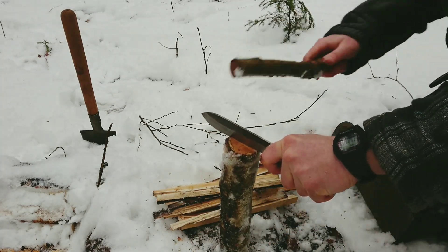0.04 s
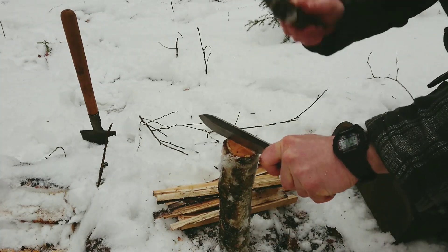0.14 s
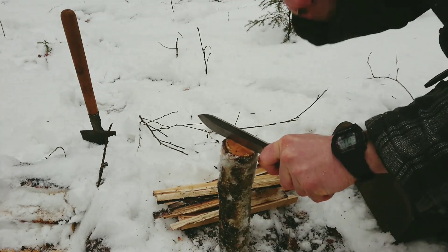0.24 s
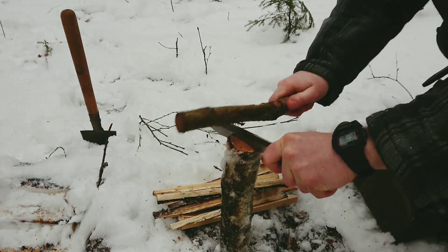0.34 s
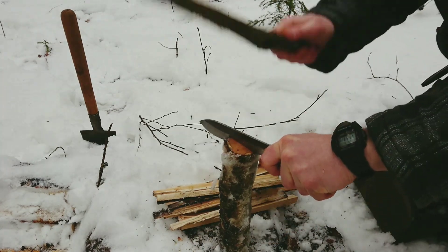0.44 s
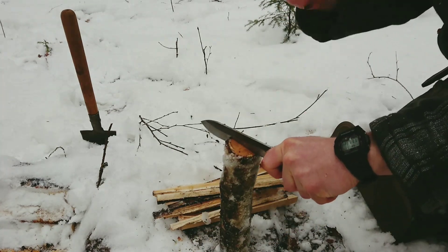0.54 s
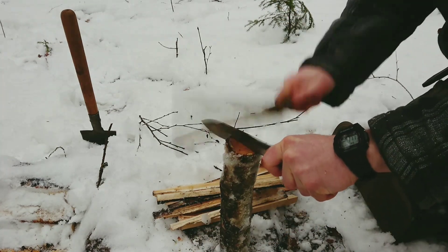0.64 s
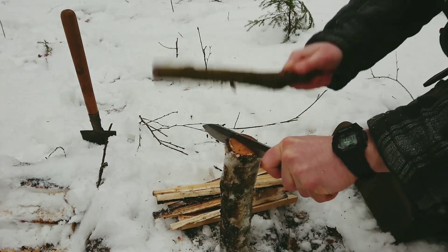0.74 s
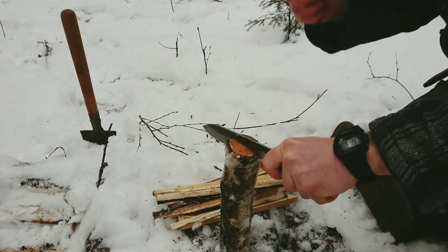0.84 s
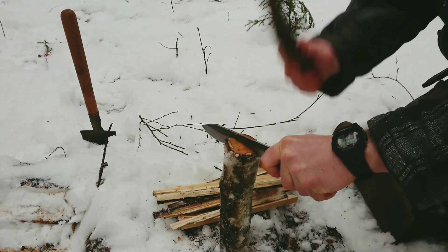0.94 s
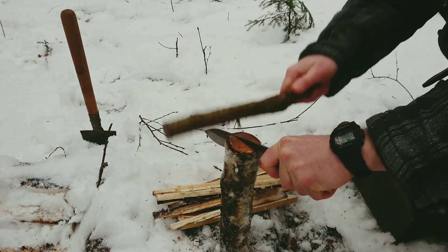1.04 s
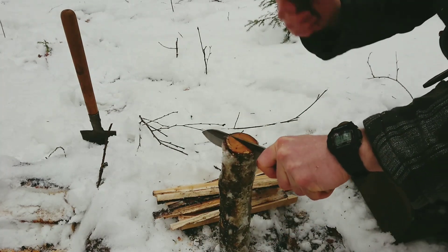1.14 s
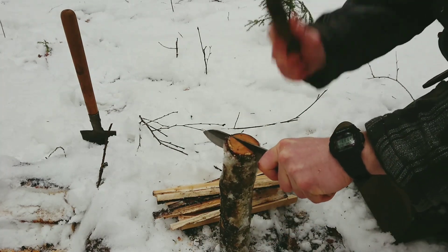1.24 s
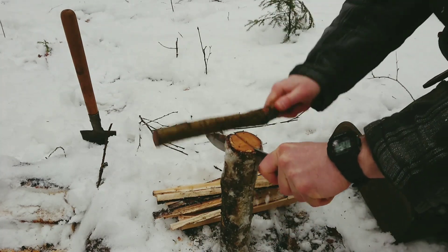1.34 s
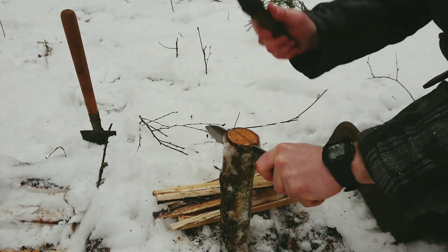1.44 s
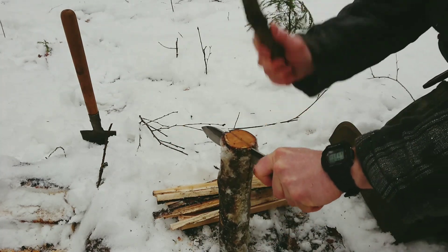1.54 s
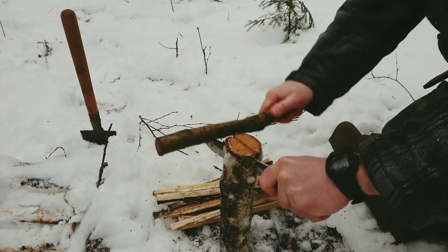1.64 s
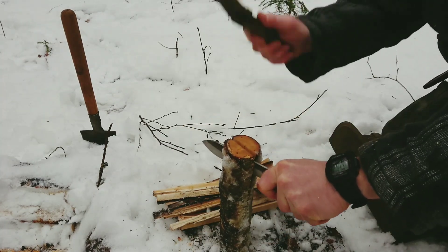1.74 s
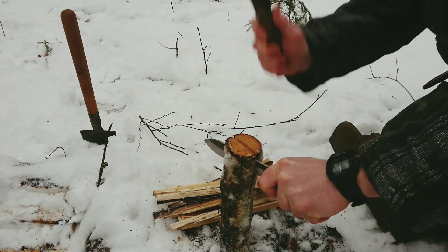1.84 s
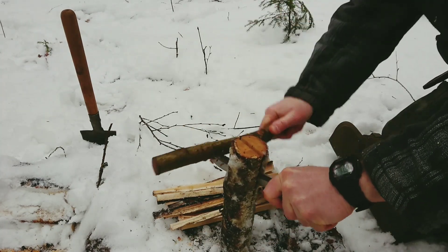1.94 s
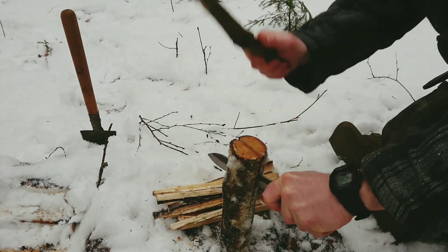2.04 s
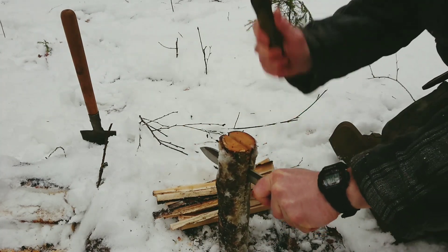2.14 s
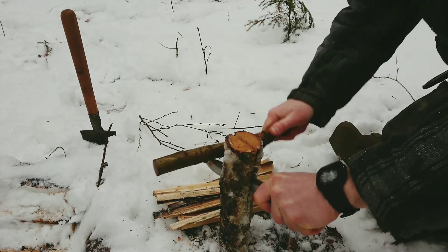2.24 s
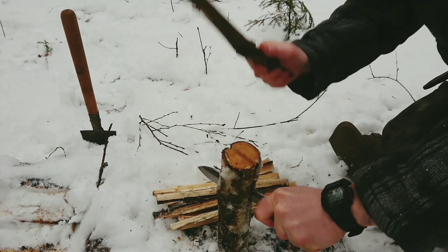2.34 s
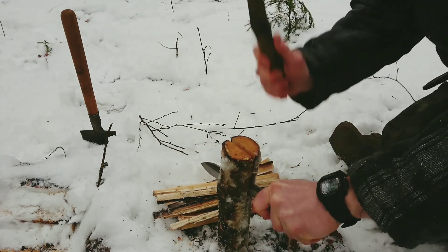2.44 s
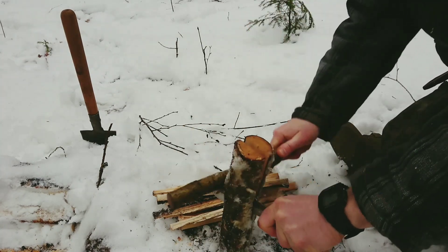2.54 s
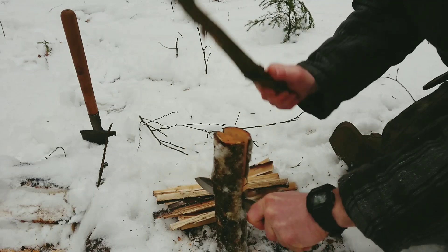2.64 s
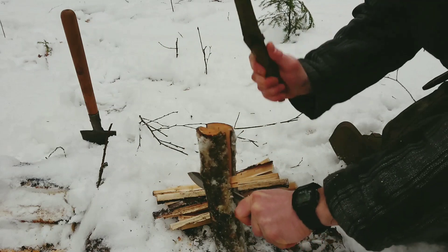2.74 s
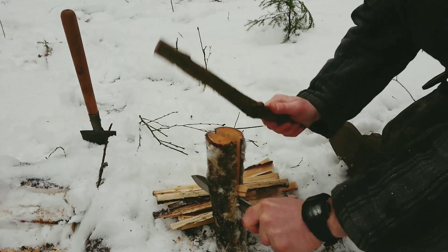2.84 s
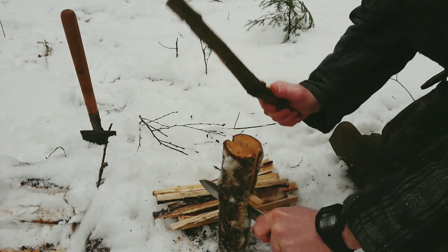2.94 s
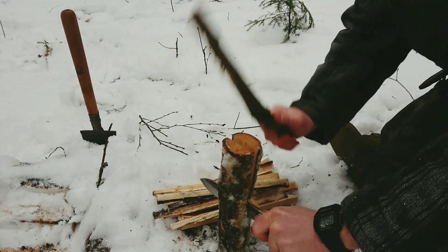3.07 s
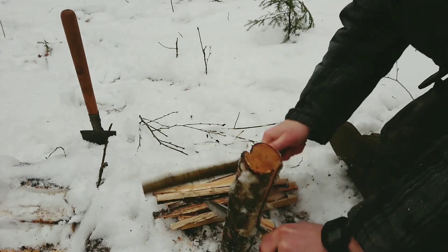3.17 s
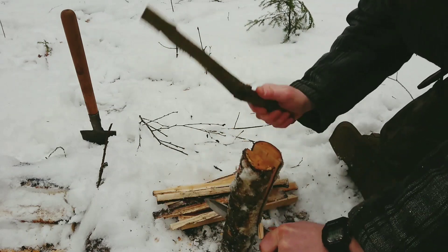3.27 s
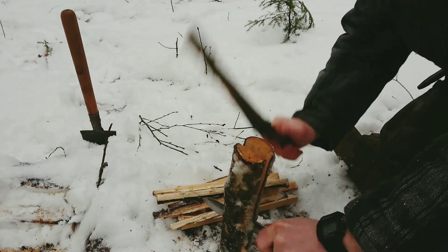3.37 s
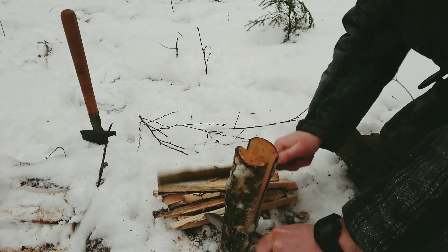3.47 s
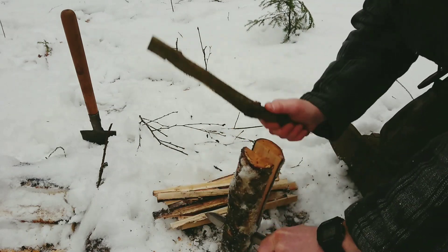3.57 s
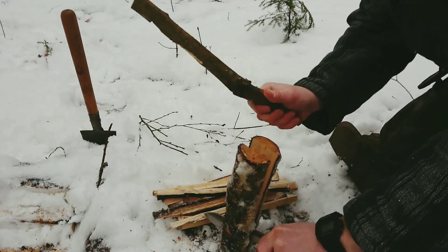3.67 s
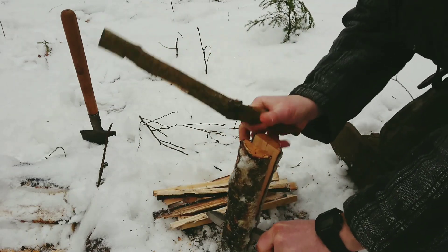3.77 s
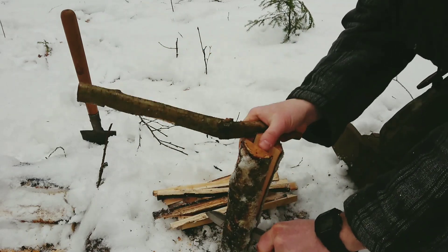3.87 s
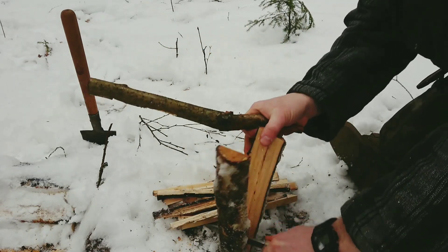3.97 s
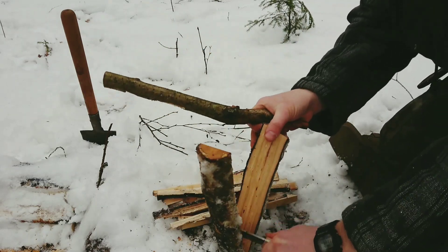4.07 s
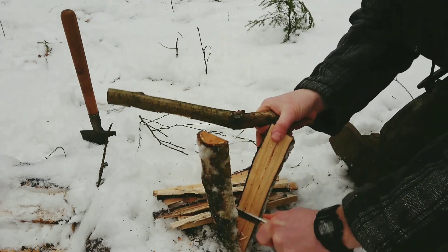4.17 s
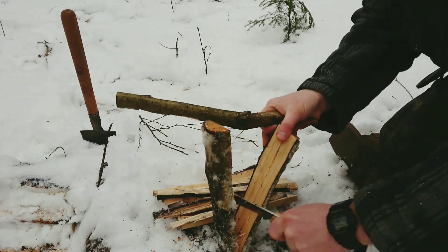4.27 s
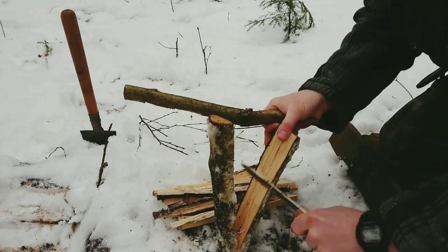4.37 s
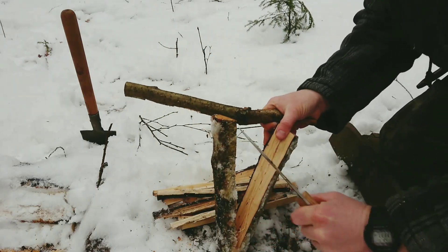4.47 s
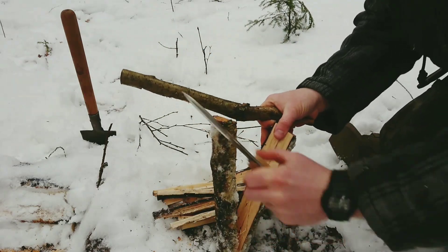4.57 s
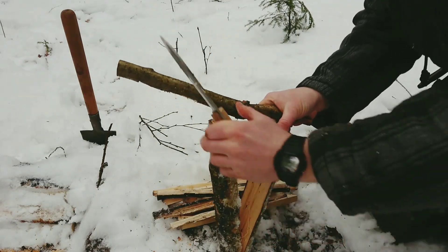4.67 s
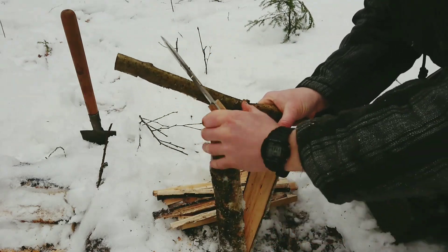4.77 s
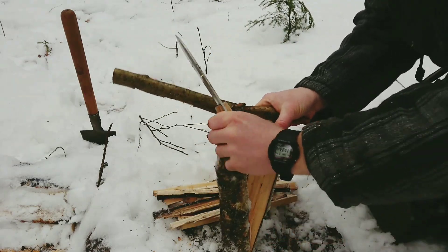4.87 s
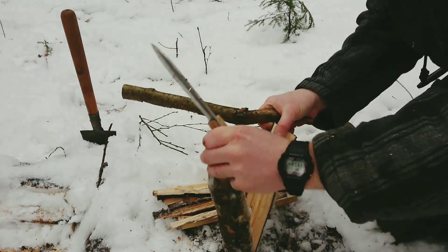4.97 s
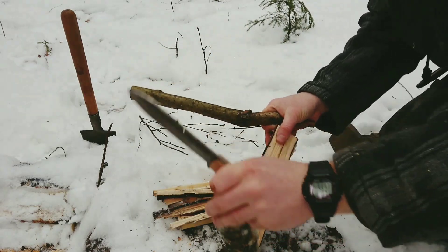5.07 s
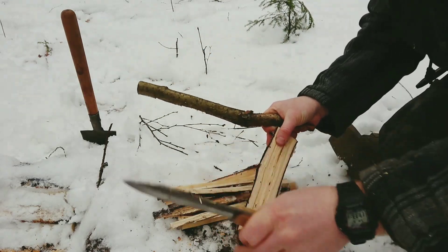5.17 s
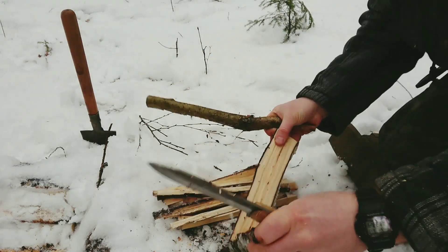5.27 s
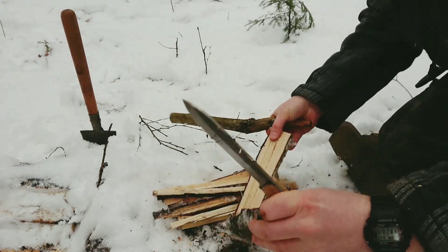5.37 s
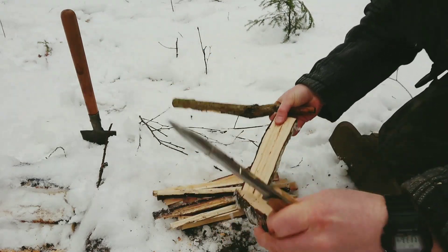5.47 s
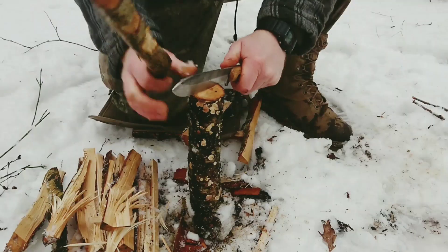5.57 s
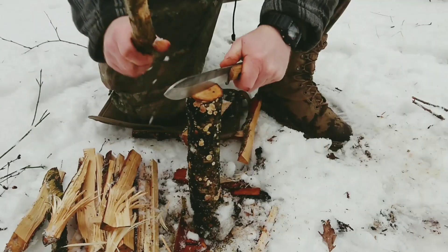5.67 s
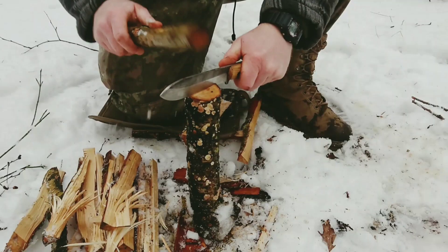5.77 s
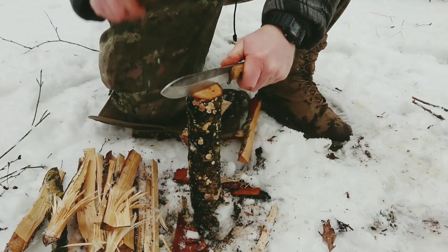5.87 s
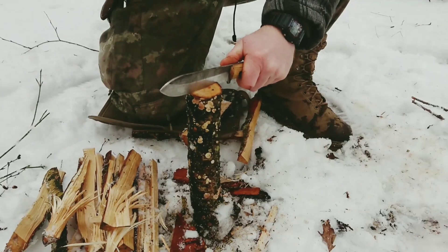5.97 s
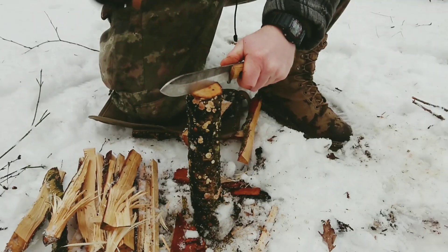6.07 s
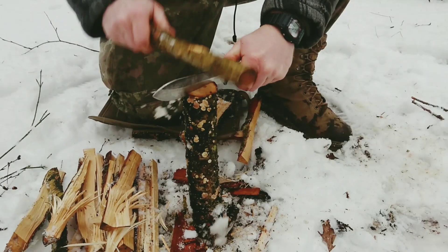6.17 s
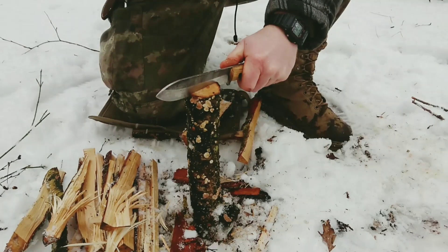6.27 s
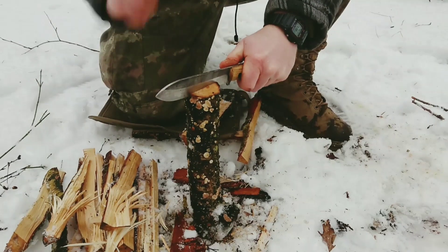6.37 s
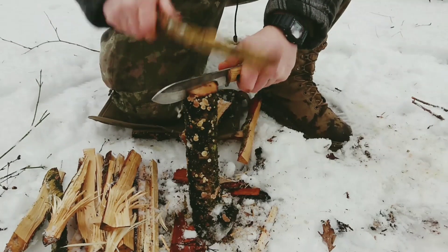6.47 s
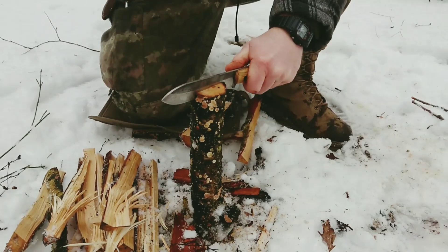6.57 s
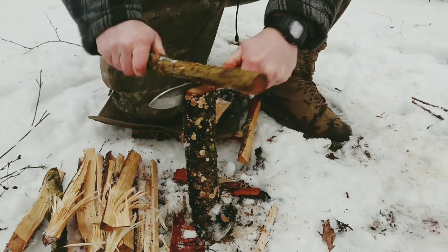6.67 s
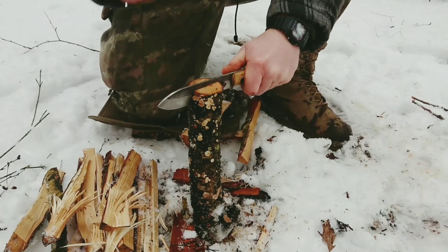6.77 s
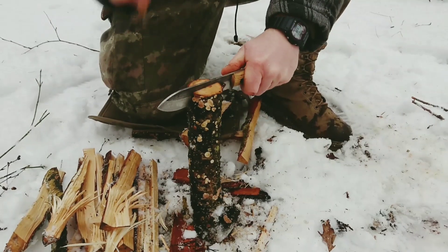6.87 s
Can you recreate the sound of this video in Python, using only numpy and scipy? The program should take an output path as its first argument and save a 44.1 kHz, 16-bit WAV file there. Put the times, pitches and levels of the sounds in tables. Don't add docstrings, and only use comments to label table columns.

```python
import sys
import numpy as np
from scipy import signal
from scipy.io import wavfile

SR = 44100
rng = np.random.default_rng(int(sys.argv[2]) if len(sys.argv) > 2 else 0)


def voltage_ratio(decibels):
    exponent = np.asarray(decibels, float) / 20
    return 10 ** exponent


def master_out(mix):
    frames = np.transpose(np.atleast_2d(mix))
    ceiling = np.clip(frames, -1, 1)
    pcm = np.round(ceiling * 32767).astype(np.int16)
    wavfile.write(sys.argv[1], SR, pcm)


N = 304731
GAP_START_S, GAP_END_S = 5.489, 5.496


def rms_one(x):
    return x / np.sqrt(np.mean(x ** 2) + 1e-20)


def in_time(rows):
    s, *columns = np.transpose(rows)
    return [np.interp(np.arange(N) / SR, s, c) for c in columns]


def at_hz(points, hz, column=1):
    table = np.array(points)
    return np.interp(np.log(hz), np.log(table[:, 0]), table[:, column])


def add(track, s, sound):
    i = round(s * SR)
    track[i:i + len(sound)] += sound[:max(N - i, 0)]


def bandpass(x, order, low_hz, high_hz):
    return signal.sosfilt(signal.butter(order, [low_hz, high_hz], "band", fs=SR, output="sos"), x)


def drift(rate):
    r = np.exp(-80 * np.pi * rate / SR)
    slow = signal.lfilter([1], [1, -2 * r, r * r], rng.standard_normal(N // 40 + 2002))[2000:]
    return np.interp(np.arange(N) / 40, np.arange(len(slow)), rms_one(slow))


def ring(force, hz, t60):
    r = voltage_ratio(-60 / (max(t60, .001) * SR))
    w = 2 * np.pi * hz / SR
    return signal.lfilter([0, np.sin(w)], [1, -2 * r * np.cos(w), r * r], force + 1e-18)


def bands(low_hz, high_hz, white):
    edges = low_hz * 2 ** np.arange(0, np.log2(high_hz / low_hz), .5)
    for k, (low, high) in enumerate(zip(edges, edges[1:])):
        yield np.sqrt(low * high), bandpass(white[k % 2], 2, low, high)


def coloured(spectrum, white, patchy_db, rate):
    low_hz, high_hz = spectrum[0][0], min(spectrum[-1][0] * 1.4, 19000)
    total = 0
    for hz, x in bands(low_hz, high_hz, white):
        total = total + voltage_ratio(at_hz(spectrum, hz) + patchy_db * drift(rate)) * x
    return rms_one(total)


# t/s, near level/dB, far level/dB
BREEZE = [(0, -46.5, -46), (.35, -48, -45.5), (.6, -51.5, -56.5), (1.4, -56.5, -55), (2.4, -56.5, -53.5),
          (3.5, -55.5, -53.5), (4.3, -54.5, -51.5), (4.65, -41.5, -49), (5.0, -41.5, -52), (5.49, -44, -45),
          (5.5, -34, -42), (5.72, -30.5, -43.5), (5.94, -27, -45), (6.2, -33, -46.5), (6.91, -31.5, -66)]
# f/Hz, level per Hz/dB
WIND = [(12, -47.5), (20, -5), (39, 4.5), (80, 4.5), (173, -11), (228, -18), (400, -34), (520, -47.5),
        (880, -120)]
# f/Hz, level per Hz/dB
HUM = [(59, -18), (100, -12.5), (224, -12), (335, -5), (492, -6), (970, -7.5), (1250, -11.5), (4020, -20),
       (15000, -38.5), (16000, -36)]
# f/Hz, level per Hz/dB
GUST = [(88, -27), (150, 0), (404, -20.5), (835, -10), (935, -9.5), (1380, -21.5), (3000, -16.5),
        (3900, -61), (6600, -120)]


def air():
    wind_db, hum_db = in_time(BREEZE)
    gust_db = -59.5 + 0.85 * (wind_db + 50)
    wind = coloured(WIND, rng.standard_normal((2, N)), patchy_db=4.5, rate=8)
    hum = coloured(HUM, rng.standard_normal((2, N)), patchy_db=.7, rate=6)
    gust = coloured(GUST, rng.standard_normal((2, N)), patchy_db=.8, rate=8)
    return voltage_ratio(wind_db + 0.7) * wind + voltage_ratio(hum_db - 2.0) * hum + voltage_ratio(gust_db - 4.0) * gust


# t/s, level/dB
SLEEVE = [(0, -53), (.3, -51.5), (.5, -58.5), (1.9, -54.5), (2.7, -59), (3.4, -70), (4.9, -62), (5.46, -60),
          (5.93, -61), (6.91, -56.5)]
# f/Hz, level per Hz/dB
CLOTH = [(590, -38.5), (1000, -8.5), (2470, -8.5), (2910, -3), (3500, -5), (5070, 2.5), (5380, -7),
         (16000, -27)]


def sleeves():
    rustle_db, = in_time(SLEEVE)
    born = rng.random((2, N)) < 5000.0 * voltage_ratio(5.0 * drift(25)) / SR
    sizes_db = 4.4 * np.minimum(rng.exponential(1, (2, N)), 5)
    grains = born * rng.standard_normal((2, N)) * voltage_ratio(sizes_db)
    cloth = coloured(CLOTH, grains, patchy_db=-0.5, rate=4)
    top = signal.sosfilt(signal.butter(1, 6000, "high", fs=SR, output="sos"), cloth)
    return voltage_ratio(rustle_db + 2.5) * (cloth + (voltage_ratio(5) - 1) * top)


# t/s, length/s, level/dB, centre f/Hz
BRUSHES = [(0.12, 0.055, -41.5, 5170), (0.494, 0.024, -45, 6000), (2.702, 0.021, -47, 4970),
           (2.788, 0.046, -55, 8040), (2.909, 0.029, -42, 4080), (2.938, 0.068, -42.5, 5500),
           (3.803, 0.055, -51, 3500), (3.829, 0.011, -65, 8250), (3.929, 0.033, -41, 7130),
           (4.774, 0.056, -52, 6780), (4.942, 0.028, -51, 5030), (4.968, 0.0654, -51.5, 6000),
           (5.138, 0.053, -50, 7900), (5.237, 0.084, -52.5, 6000), (5.377, 0.021, -50, 4000),
           (5.474, 0.012, -47, 9000), (5.5, 0.018, -46.5, 8000), (5.625, 0.074, -48.5, 5600)]


def brushes():
    out = np.zeros(N)
    for s, length, db, hz in BRUSHES:
        born = rng.random(6000) < .3
        sizes_db = 2.0 * np.minimum(rng.exponential(1, 6000), 4)
        grains = rng.standard_normal(6000) * voltage_ratio(sizes_db) * born
        rub = bandpass(grains, 2, hz / 3.1, min(hz * 1.45, 18000))
        whistle = ring(grains, hz * .9, .02) + ring(grains, hz * 1.07, .02)
        sound = rms_one(rub) + 0.32 * rms_one(whistle)
        size = min(round(length * SR), 6000)
        add(out, s, voltage_ratio(db) * sound[:size] * np.hanning(size) ** 0.25)
    return out


# f/Hz, level/dB, t60/s
BATON = [(1055, -2, 0.0048), (1490, -11, .021), (2389, -4, 0.018), (3510, -1, 0.01)]
# f/Hz, level/dB, t60/s
SECOND_BATON = [(958, -3, 0.017), (1585, -0.18, 0.028), (2492, -0.17, 0.018), (3650, -1.4, .023)]


def baton_ring(force, s, mode_db):
    sound = np.zeros(len(force))
    baton = BATON if s < GAP_START_S else SECOND_BATON
    for (hz, db, t60), own_db in zip(baton, mode_db):
        pair = ring(force, hz, t60) + voltage_ratio(-5) * ring(force, hz * 1.045, .7 * t60)
        sound += voltage_ratio(db + own_db) * pair
    return sound


# f/Hz, level/dB
LOG = [(330, -35), (620, -32), (1150, -24.5), (1750, -13), (2050, -15), (2900, -19.5), (3150, -26),
       (4000, -19), (4500, -33), (5000, -26), (5600, -20), (6700, -28.5), (8400, -39)]


def log_ring(force, firm_db):
    sound = np.zeros(len(force))
    strengths, shifts = rng.standard_normal((2, len(LOG)))
    for (hz, db), strength, shift in zip(LOG, strengths, shifts):
        sound += voltage_ratio(db + 2 * strength + firm_db + 4.5) * ring(force, hz * (1 + 0.035 * shift), .013)
    return sound


# f/Hz, level/dB, t60/s, delay/s
GROUND = [
    (72.6, 12, 0.095, 0.008),
    (75.6, -11, 0.49, 0.033),
    (95.3, -1.5, 0.29, 0.0064),
]


def ground_thump(thump, s, thump_db):
    t = np.arange(SR // 2) / SR
    for k, (hz, db, t60, delay) in enumerate(GROUND):
        sign = (-1) ** (k // 2)
        add(thump, s + delay, sign * voltage_ratio(thump_db + db - 60 * t / t60) * np.sin(2 * np.pi * hz * t))


# t/s, level/dB of the second, third and fourth baton modes, ground thump level/dB
BLOWS = [(0.3277, -10, -11.5, -11.5, -18.5), (0.6514, 0, -4.5, -6.5, -18.5), (0.9714, 2.5, -7, 1, -20),
         (1.2832, 0, -7.5, -5, -20), (1.5847, -19.5, -16, -4, -22.5), (1.8893, -22, -1, 2.5, -34),
         (2.1874, -6, -4.5, -4, -24.5), (2.4755, -3, 5, -2.5, -25), (3.1029, -5, -8.5, -3, -43),
         (3.3986, -16, -7, -9, -41.5), (6.1065, -21.5, -1.5, -16, -22), (6.3935, -25, -1, -20, -19.5),
         (6.6475, -23, -10, -14, -21), (6.9082, -11, 3, -4.5, -38)]


def blows():
    knock, cracks, thump = np.zeros((3, N))
    t = np.arange(4096) / SR
    grip = np.exp(-(t / 0.011) ** 2)
    for s, *baton_db, thump_db in BLOWS:
        firm_db = 0.39 * (thump_db + 20)
        force = voltage_ratio(-10) * rng.standard_normal(len(t)) * np.exp(-t / .002) * 0.34
        force[0] = -1
        sound = baton_ring(force, s, [firm_db - 10, *baton_db]) + log_ring(force, firm_db)
        add(knock, s, voltage_ratio(23) * grip * sound)
        crack = bandpass(rng.standard_normal(len(t)), 1, 650, 4500)
        splinter = voltage_ratio(-10 - 60 * t / 0.032)
        add(cracks, s, crack * (voltage_ratio(11 - 60 * t / .016) + splinter))
        crunch = bandpass(rng.standard_normal(len(t)), 2, 130, 650)
        add(thump, s + 0.005, voltage_ratio(firm_db - 6 - 60 * t / .06) * crunch)
        ground_thump(thump, s, thump_db)
    return knock, cracks, thump


# f/Hz, level/dB, t60/s
WOODS = [(500, -48.5, .5), (1000, -45, 0.23), (1500, -33.5, 0.82), (2540, -41.5, 1), (3500, -26, 0.62),
         (4600, -35, 0.17), (6000, -38, 0.27), (11000, -73, 0.87)]
# delay t/s, level over the wash/dB
NEAR_TRUNKS = [
    (0.051, 8),
    (0.069, 2),
    (.077, 7.5),
    (.112, 3),
]


def woods(x):
    t = np.arange(round(1.2 * SR)) / SR
    swell = 1 - np.exp(-np.maximum(t - .02, 0) / .012)
    near_db = sum(db * np.exp(-((t - delay) / .003) ** 2) for delay, db in NEAR_TRUNKS)
    trunks = rng.standard_normal((2, len(t))) * voltage_ratio(near_db)
    echo = np.zeros(len(t))
    for hz, band in bands(320, 16000, trunks):
        echo += voltage_ratio(at_hz(WOODS, hz) - 60 * t / at_hz(WOODS, hz, column=2)) * band
    return signal.fftconvolve(x, voltage_ratio(-22.0) * swell * echo)[:N]


# t/s, peak level/dB, pitch f/Hz
SNAPS = [(.3486, -2.5, 3946), (.3554, -7.5, 3690), (.3635, -10, 2060), (.386, -24, 5230), (.499, -25, 5100),
         (.5192, -17.5, 5510), (.5501, -32, 3200), (.856, -26.5, 3810), (.8804, -36, 1550),
         (1.508, -22, 6120), (1.5584, -29.5, 3490), (1.6477, -20.5, 2975), (1.8309, -24.5, 3870),
         (2.0981, -29.5, 3720), (2.143, -31, 3645), (2.4334, -35, 1800), (2.4986, -15, 6990),
         (2.5301, -23.5, 3530), (2.59, -18, 2516), (2.5895, -18.5, 9000), (2.6955, -23, 3890),
         (2.8055, -33.5, 3420), (2.911, -27.5, 4240), (2.9234, -35.5, 4240), (2.9554, -27.5, 5100),
         (2.9724, -28, 5910)]
# t/s, peak level/dB, pitch f/Hz
TICKS = [(1.054, -38, 7830), (1.192, -35, 8070), (3.26, -27.5, 4500), (3.3, -29.5, 3940),
         (3.465, -26.5, 8400), (3.538, -35, 6000), (3.979, -25.5, 11000), (4.0168, -32.5, 7120),
         (4.638, -34, 2520), (5.2543, -22, 6000), (5.336, -43.5, 7000), (5.402, -38, 7470),
         (5.552, -42, 5500), (6.266, -30, 6360), (6.306, -34, 4900)]
# t/s, peak level/dB, pitch f/Hz
TEARS = [
    (3.1008, -2.5, 3500),
    (3.1138, -0.5, 3630),
    (3.1267, -34.5, 4010),
    (3.1373, -22, 7300),
    (3.1416, -29.5, 1500),
    (3.8073, -30.5, 3720),
    (3.8258, -28.5, 2650),
    (4.0604, -33, 1823),
    (4.1061, -34, 3480),
]
# t/s, peak level/dB, pitch f/Hz
PINGS = [
    (4.7416, -22.5, 2830),
    (4.815, -27.5, 2870),
    (5.0523, -36, 4210),
    (5.3793, -30, 3890),
    (5.6447, -28.5, 3620),
    (5.6698, -26, 3600),
]


def snaps():
    out, t = np.zeros(N), np.arange(3000) / SR
    # rows, t60/s, share that rings at the pitch 0-1
    kinds = [(SNAPS, 0.016, .25), (TEARS, .014, .2), (TICKS, 0.0089, .15), (PINGS, 0.022, .4)]
    for rows, t60, share in kinds:
        for s, peak_db, hz in rows:
            burst = rng.standard_normal(len(t)) * voltage_ratio(-60 * t / t60)
            burst[0] = 2.1
            bright = bandpass(burst, 1, hz * 0.35, min(hz * 1.5, 16000))
            tone = ring(burst * voltage_ratio(-40 * t / t60), hz, t60)
            sound = (1 - share) * bright / abs(bright).max() + share * tone / abs(tone).max()
            add(out, s - .0003, voltage_ratio(peak_db + 2.5) * sound)
    return out


# t/s, peak level/dB, pitch f/Hz, t60/s
KNOCKS = [(0.3641, 3, 435, 0.0053), (.668, 5.5, 330, 0.004), (0.6706, -8, 500, 0.011),
          (0.989, -6.5, 227, 0.0085), (1.019, -26.5, 400, 0.0065), (.425, -32.5, 443, 0.015),
          (.535, -32.5, 306, .015), (2.2065, -12.5, 289, 0.0097), (1.302, -5, 303, 0.0065),
          (1.645, -23.5, 910, 0.017), (2.89, -16, 390, 0.014), (3.117, -29, 316, 0.012),
          (3.643, -37.5, 280, 0.04), (3.955, -33, 130, 0.071), (3.929, -38, 610, 0.023),
          (4.18, -38, 192.3, 0.036), (4.738, -16, 636, 0.005), (6.123, -8, 473, 0.013),
          (6.408, -2, 500, 0.0035), (6.666, -9.5, 417, 0.0076)]


def knocks():
    out, t = np.zeros(N), np.arange(4000) / SR
    push = np.zeros(4000)
    push[:16] = np.hanning(16) / 8
    for s, peak_db, hz, t60 in KNOCKS:
        grit = signal.lfilter([.15], [1, -.85], rng.standard_normal(4000)) * voltage_ratio(-60 * t / t60)
        add(out, s, voltage_ratio(peak_db + 2.0) * (ring(push, hz, t60) + 0.45 * grit))
    return out


# t/s, peak level/dB, length/s
SPLIT = [(3.89, -4, 0.0031), (3.899, -27, 0.0075), (3.9066, -24, .002), (3.908, 6, .002),
         (3.912, -9, .0025), (3.917, -14.5, .0015), (3.9225, -11, 0.0012), (3.9242, -5.5, .002),
         (3.9286, -12.5, .002), (3.935, -24.5, 0.0089), (3.949, -18.5, 0.0061), (3.962, -13, 0.0067)]
# f/Hz, level/dB, t60/s
HALVES = [(1900, -5, .005), (2500, 2, .007), (3450, -2, .006), (4100, -12, .004), (7000, -17, .002)]


def split():
    out, t = np.zeros(N), np.arange(1500) / SR
    for s, peak_db, length in SPLIT:
        swell = np.minimum(t / (12.0 * length ** 2), 1)
        force = rng.standard_normal(len(t)) * swell * np.exp(-(t / length) ** 3)
        force[0] = -.006 / length
        sound = np.zeros(len(t))
        for hz, db, t60 in HALVES:
            shift = .025 * rng.standard_normal()
            sound += voltage_ratio(db) * ring(force, hz * (1 + shift), t60)
        sound = np.diff(sound, prepend=0)
        grit = signal.lfilter([.2, 0, -.2], [1, -.5, .3], force)
        add(out, s, voltage_ratio(peak_db) * (sound / abs(sound).max() + voltage_ratio(-16) * grit))
    return out


def scene():
    background = air() + sleeves() + brushes()
    knock, cracks, thump = blows()
    small = snaps() + knocks()
    tear = split()
    edges = np.zeros(N)
    starts = [round(row[0] * SR) for row in BLOWS]
    edges[starts] = voltage_ratio(np.array(BLOWS)[:, 1:4].mean(axis=1) + 31.0)
    echo = woods(voltage_ratio(-13) * np.diff(knock, prepend=0) + edges + small + tear / 3)
    return (knock + cracks + small + tear + echo + thump + background)[None]


def top_cut(x):
    return signal.sosfilt(signal.butter(12, 16760, fs=SR, output="sos"), x)


def record(dry):
    t = np.arange(N) / SR
    hiss = voltage_ratio(-64) * np.diff(rng.standard_normal(N + 1))
    x = np.clip(dry + hiss, -1.05, 1.05)
    x = signal.sosfilt(signal.butter(1, 11000, fs=SR, output="sos"), x)
    x = signal.sosfilt(signal.butter(2, 44.3, "high", fs=SR, output="sos"), x)
    outside_gap_s = np.maximum(GAP_START_S - t, t - GAP_END_S)
    x = x * np.clip(outside_gap_s / 0.0012, 0, 1)
    return top_cut(x)


dry = scene()
out = record(dry)
master_out(out)
```